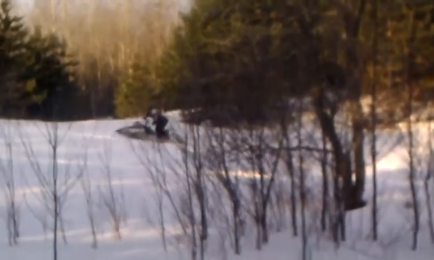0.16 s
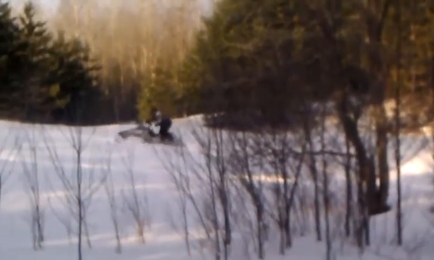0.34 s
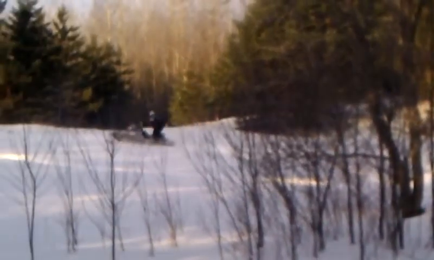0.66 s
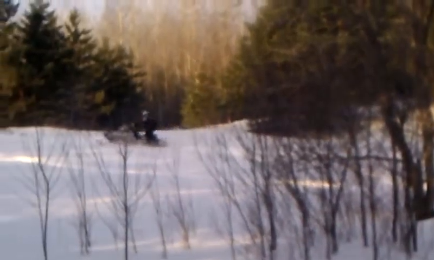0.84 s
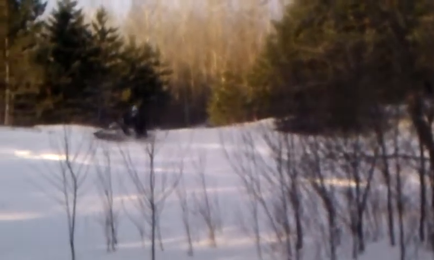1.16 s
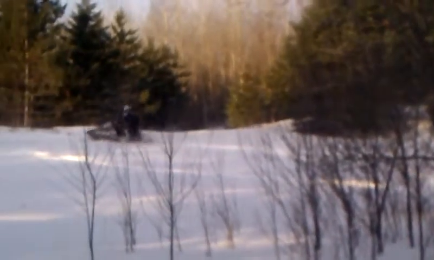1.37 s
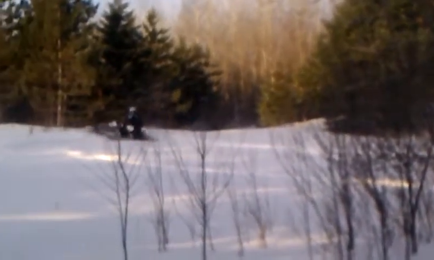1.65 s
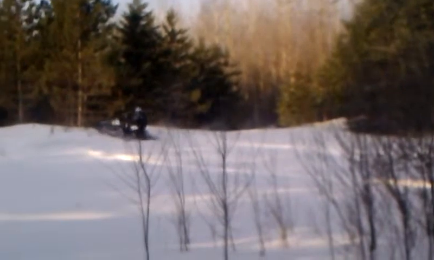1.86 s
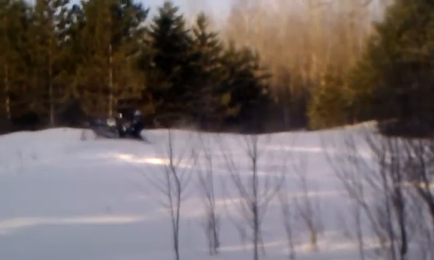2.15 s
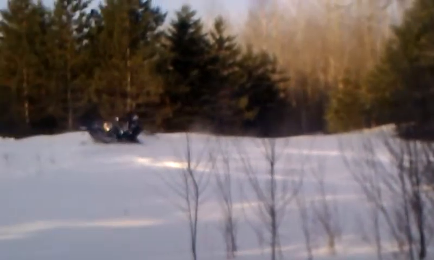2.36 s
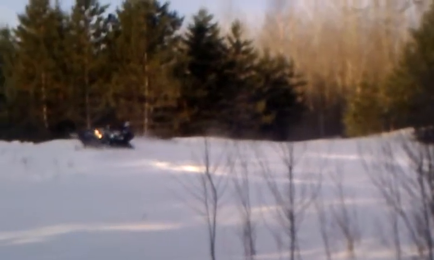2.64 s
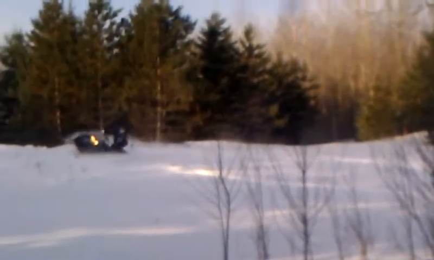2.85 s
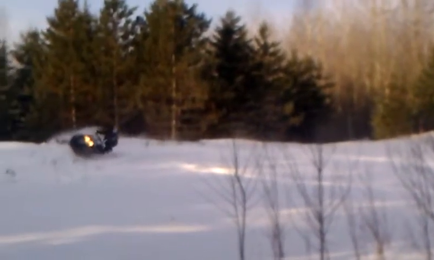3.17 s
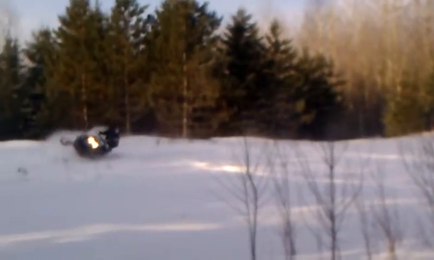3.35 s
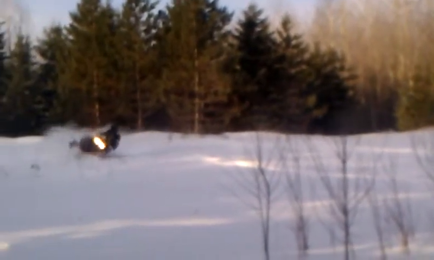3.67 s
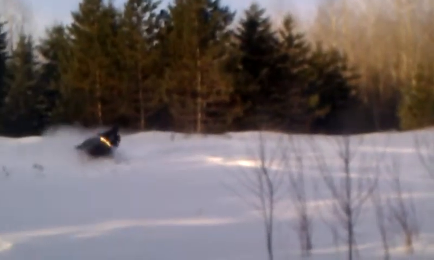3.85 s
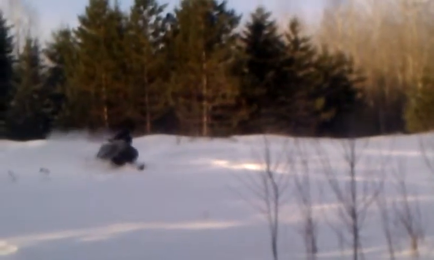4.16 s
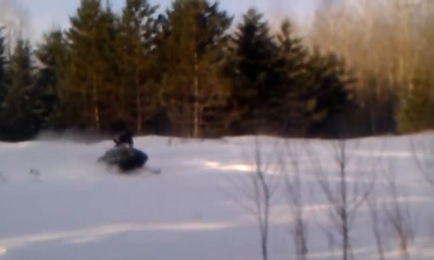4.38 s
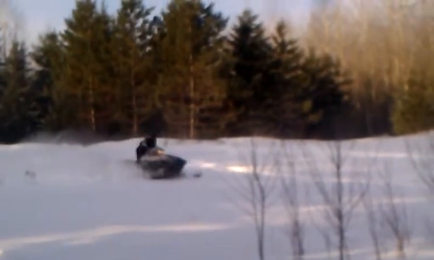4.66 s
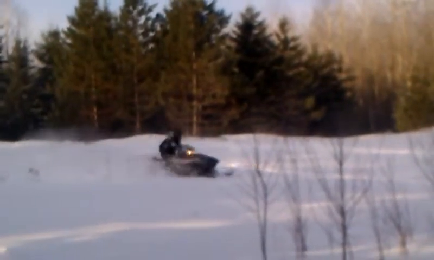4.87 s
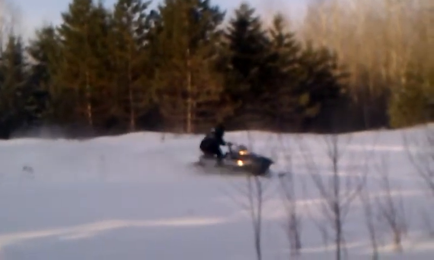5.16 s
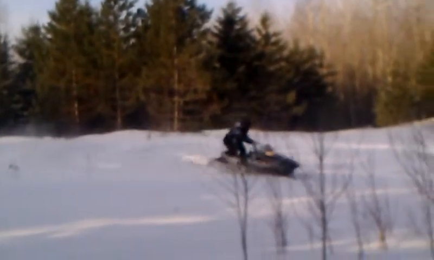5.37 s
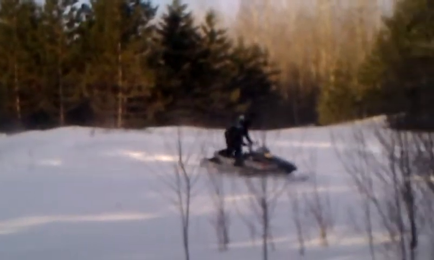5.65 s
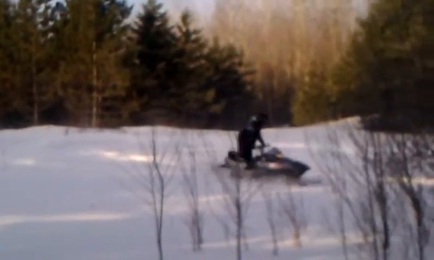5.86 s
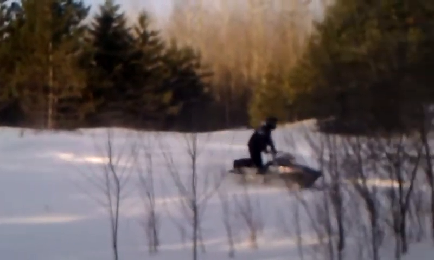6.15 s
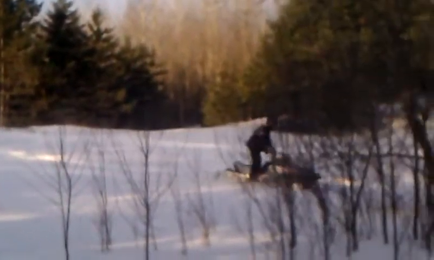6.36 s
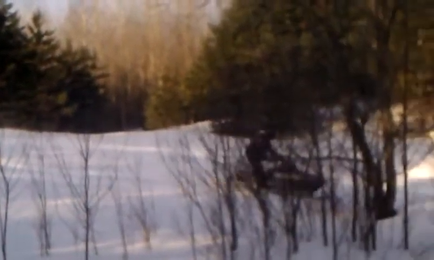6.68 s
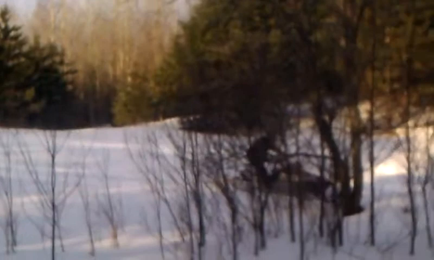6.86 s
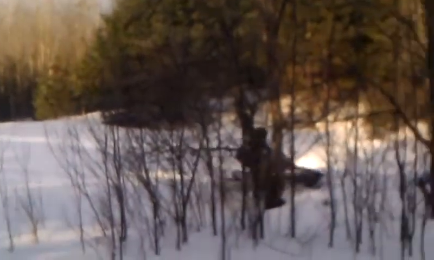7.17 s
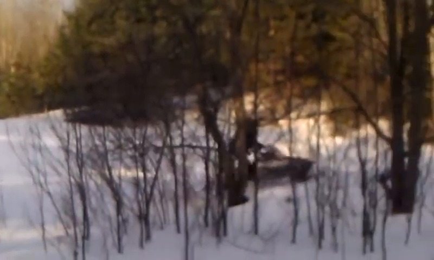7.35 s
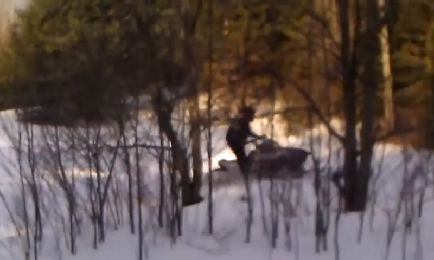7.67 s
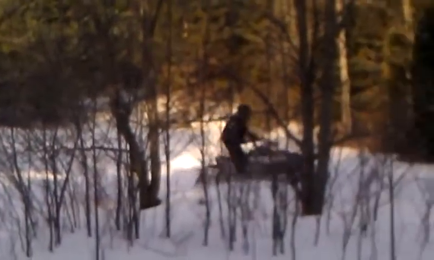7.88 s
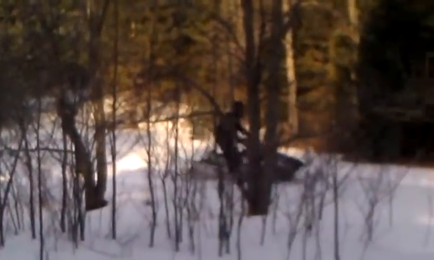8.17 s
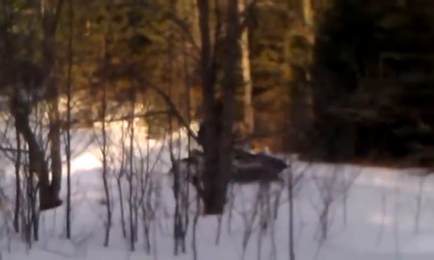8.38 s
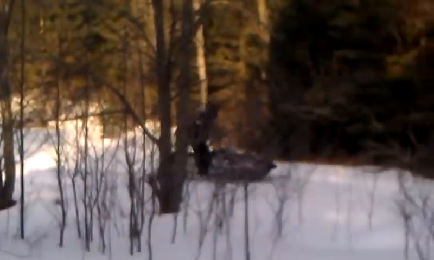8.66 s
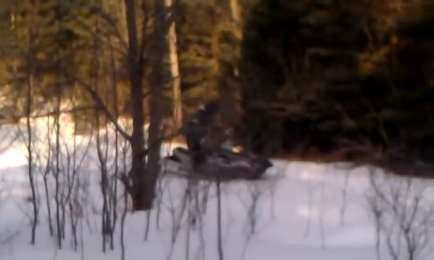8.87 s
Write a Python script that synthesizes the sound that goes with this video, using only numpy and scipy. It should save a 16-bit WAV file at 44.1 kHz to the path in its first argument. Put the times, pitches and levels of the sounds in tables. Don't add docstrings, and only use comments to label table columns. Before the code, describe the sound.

Buzzy, raspy snowmobile engine revving in bursts, holding a distorted full-throttle howl, then dropping to stuttering pops with short revs among trees.

```python
import sys
import numpy as np
from scipy import signal
from scipy.io import wavfile
from scipy.ndimage import uniform_filter1d, minimum_filter1d

SR = 44100
rng = np.random.default_rng(int(sys.argv[2]) if len(sys.argv) > 2 else 0)


def voltage_ratio(level):
    return 10 ** (np.asarray(level, float) / 20)


def bounce(signal):
    frames = np.transpose(np.atleast_2d(signal))
    limited = np.clip(frames, -1, 1)
    pcm = np.round(limited * 32767).astype(np.int16)
    wavfile.write(sys.argv[1], SR, pcm)


N = 397782
SPLIT_HZ = 1120
LOAD_LAG_S, MIDDLE_HZ = 0.042, 200

# start_s, firing_rate_hz headed for, gas_noise_share (0-1)
LEVER = [(0, 156, .8), (.16, 248, .3), (.38, 202, .35), (.49, 75, .9), (.65, 257, .33), (.83, 212, .35),
         (.88, 126, .9), (1.41, 239, .33), (1.65, 210, .3), (1.73, 286, .3), (2.03, 262.4, .22),
         (2.85, 266.4, .1), (4.84, 116, .85), (5.61, 270, .27), (5.75, 273, .27), (5.87, 112, .85),
         (6.28, 175, .6), (6.49, 228, .27), (6.67, 142, .3), (6.8, 163, .3), (7.16, 139, .5),
         (7.42, 249, .25), (7.62, 124, .75), (8.09, 135.3, .75)]
LOAD_DB = [-26, -26.5, -33, -29.5, -26.5, -33, -29.5, -25.5, -27, -29, -28, -27, -26.5, -20.5, -23, -28,
           -26.5, -20.5, -23.5, -24.5, -28.5, -18, -28, -27.5]
# start_s, peak_db, decay_t60_s
POPS = [(5.697, -6, 0.13), (5.71, -5, 0.11), (6.152, -9.5, 0.13), (6.173, -15, 0.054), (6.236, -8, 0.076),
        (6.28, -8.5, 0.058), (6.329, -14, 0.27), (6.417, -11.5, 0.47), (6.748, -5.5, 0.3),
        (6.789, -11, 0.27), (6.812, -4, 0.26), (6.85, -11.5, 0.22), (6.905, -13, 0.2), (6.946, -13, 0.15),
        (6.97, -11, 0.17), (7.035, -3.5, 0.2), (7.185, -8, 0.052), (7.212, -14, 0.095), (7.26, -11, 0.05),
        (7.279, -11.5, 0.049), (7.347, -10, 0.086), (7.378, -11.5, 0.33), (7.399, -8, 0.23),
        (7.656, -7, 0.15), (7.729, -4, 0.059), (7.748, -5.5, 0.12), (7.791, -5.5, 0.053),
        (7.809, -4.5, 0.047), (7.856, -4, 0.11), (7.874, -7.5, 0.073), (7.907, -8, 0.05),
        (7.962, -6, 0.063), (7.983, -9.5, 0.045), (8.037, -11, 0.12), (8.099, -13.5, 0.39),
        (8.177, -9.5, 0.1), (8.25, -8.5, 0.034), (8.273, -10, 0.05), (8.308, -10, 0.04), (8.346, -9, 0.11),
        (8.405, -12, 0.41), (8.42, -16, 0.1), (8.473, -15.5, 0.05), (8.481, -12, 0.068), (8.553, -24, 0.11),
        (8.612, -14, 0.11), (8.65, -14, 0.071), (8.672, -13, 0.054), (8.699, -12.5, 0.073),
        (8.732, -13, 0.06), (8.767, -8, 0.062), (8.791, -16, 0.045), (8.83, -14, 0.075),
        (8.849, -12.5, 0.093), (8.916, -13, 0.079), (8.953, -13, 0.1)]
# time_s, away_share (0-1)
TURNING = [
    (0, 0.2),
    (5.5, 0.02),
    (6.1, 0.81),
    (9.1, 0.93),
]
# time_s, first_db, fifth_db, sixth_db, half_orders_db
ARC = [(1.9, -3, 0, 5.5, 9), (2.3, 0.5, -8, -4, 9), (2.6, -2.5, 1, -7, -3), (3.0, -4.5, -0.5, -5, 4),
       (3.3, -11.5, -3.5, -0.5, -1.5), (3.6, -3, 2.5, 1.5, 0), (4.0, 1.5, -1.5, -1.5, 0.5),
       (4.3, 4, -2.5, 0, -1.5), (4.5, 8, 4.5, 2.5, -1.5), (4.8, -5.5, 2, 0, -4.5)]
# time_s, reduction_db
HELD = [(0, 0), (1.9, 0), (2.2, 1), (3.06, 1.5), (3.18, 7), (3.32, 9.5), (3.7, 11.5), (4.0, 12.5),
        (4.85, 12.5), (4.89, 3), (5.05, 0), (9.1, 0)]
# frequency_hz, level_db
ROAR = [(59, -67.5), (100, -56.5), (260, -23), (479, -22), (515, -12), (719, -19.5), (773, 0), (868, -12),
        (1030, -11.5), (1190, -14.5), (1280, -3), (1480, -2), (1650, -7.5), (2100, -2.5), (2300, -7),
        (2450, -15.5), (3200, -24), (4160, -68), (7040, -120)]


def engine():
    _, target_hz, noise_share = np.transpose(LEVER)
    hz = uniform_filter1d(lever(target_hz, 0.238, 143), size=2000)
    rough = lever(noise_share, LOAD_LAG_S, noise_share[0])
    opening_db = lever(LOAD_DB, LOAD_LAG_S, LOAD_DB[0])
    shutting_db = lever(LOAD_DB, 0.026, LOAD_DB[0])
    load_db = np.minimum(opening_db, shutting_db)
    away = np.clip(curve(TURNING)[0], 0, 1)
    db_per_hz = 0.1624 - 0.0866 * away
    exhaust_db = load_db + db_per_hz * (hz - MIDDLE_HZ)
    turns = np.cumsum(hz * (1 + 0.0014 * wander(hz=10))) / SR
    throttle = np.clip((hz - 222) / 38, 0, 1)
    puff = np.exp(-(turns % 1) / 6.1)
    return (exhaust(turns, rough, throttle, away, puff, exhaust_db)
            + purr(turns, hz, throttle, away, exhaust_db)
            + hiss(hz, throttle, away, puff)
            + pops(hz))


def exhaust(turns, rough, throttle, away, puff, exhaust_db):
    low_note_db = [2.5, -2, 2, -3.5, 0, -9.5, 1.5, -3, 5, 0.1, 4, 1, 1, 7.5, 0.5, -3, 5, -2, 3, 8, 5, -3, 5,
                   5.5]
    high_note_db = [3, 3, 3, 3, 3, 3, 3, 0.1, 0.1, 0.1, 0.1, 0.1, 3, 3, 6.7, 0.1, 0.1, 3, 0.1, 0.1, 0.1,
                    0.1, 0.1, 0.1]
    pulses = exhaust_pulses(turns, rough, throttle, away)
    gas = gas_noise(rough, throttle, away, puff)
    blend = voltage_ratio(exhaust_db) * (np.sqrt(1 - rough) * pulses + np.sqrt(rough) * gas)
    x = note(blend, [150, SPLIT_HZ], misses()) + abs(gusts()) * gas
    x = note(x, [650, 1050], lever(low_note_db, LOAD_LAG_S, low_note_db[0]))
    return note(x, [1780, 2340], lever(high_note_db, LOAD_LAG_S, high_note_db[0]))


def exhaust_pulses(turns, rough, throttle, away):
    # frequency_hz, gain_db
    facing = [(100, -7), (400, -3.5), (620, 5), (800, -18), (960, 12), (1400, -2.5), (3000, 3)]
    piped = tail_pipe(turns, rough)
    lumpy = steady((1 - away) * colour(piped, facing) + away * piped)
    return np.sqrt(throttle) * orders(turns) + np.sqrt(1 - throttle) * lumpy


def orders(turns):
    # multiple of the firing rate, level_db
    multiples = [(1, -7.5), (2, -1), (3, 10), (4, -1), (5, 6), (6, 4), (7, 2.5), (8, 3.5), (9, -3),
                 (10, -9.5), (11, -14), (12, -20), (13, -14), (14, -14.5), (15, -10), (16, -12.5),
                 (17, -13.5), (18, -13), (19, -27.5), (20, -23.5), (21, -32), (22, -24.5), (23, -29),
                 (24, -16.5)]
    # frequency_hz, level_db
    half_response = [(100, -38), (400, -39.5), (660, -21.5), (930, -12.5), (1200, -32), (1500, -20),
                     (2000, -18), (2500, -55.5), (4000, -25.5), (6000, -29), (8600, -54.5), (11000, -90)]

    def swell():
        return abs(1 + 0.45 * (wander(hz=7) + 1j * wander(hz=7)))

    def partial(k):
        return np.cos(2 * np.pi * (k * turns + rng.random()))

    first_db, fifth_db, sixth_db, half_db = curve(ARC)
    turned_db = {1: first_db, 5: fifth_db, 6: sixth_db}
    whole = np.zeros(N)
    for k, db in multiples + [(k, -26.5) for k in range(25, 33)]:
        if k != 3:
            upper_db = 4.5 * (k > 9)
            whole += voltage_ratio(db + upper_db + turned_db.get(k, 0)) * swell() * partial(k)
    f, db = np.transpose(half_response)
    half = np.zeros(N)
    for k in np.arange(12) + 0.5:
        half += voltage_ratio(np.interp(k * 265, f, db)) * partial(k)
    return evened(whole + voltage_ratio(half_db) * half * swell())


def tail_pipe(turns, rough):
    # frequency_hz, gain_db
    response = [(59, -87.5), (100, -55.5), (185, -26.5), (279, -12), (390, 3), (461, -4), (506, -9.5),
                (600, -8), (680, 8), (765, 6), (850, -3.5), (972, -5.5), (1110, -14), (1440, 6.5),
                (3390, -34), (6500, -17.5), (8600, -37.5), (11200, -62.5), (18900, -120)]
    low = butter(firings(turns, 0.65 * rough, 6), 4, SPLIT_HZ, "low")
    high = butter(firings(turns, rough, 14), 4, SPLIT_HZ, "high")
    return colour(low + smeared(high), response)


def firings(turns, rough, scatter):
    at = np.flatnonzero(np.diff(np.floor(turns)) > 0)
    late = (turns[at + 1] % 1) / (turns[at + 1] - turns[at])
    chance = rng.standard_normal((4000, 2))[:len(at)]
    size = voltage_ratio(6.2 * (np.arange(len(at)) % 2) + 8.0 * rough[at] * chance[:, 0])
    place = at + 1 - late + scatter * rough[at] * chance[:, 1]
    whole = np.clip(place.astype(int), 0, N - 2)
    train = np.zeros(N)
    np.add.at(train, whole, size * (1 - place % 1))
    np.add.at(train, whole + 1, size * (place % 1))
    return train


def smeared(x):
    t = np.arange(2000) / SR
    taps = rng.choice([-1., 1.], len(t)) * (rng.random(len(t)) < 1200 / SR) * np.exp(-t / 0.0056)
    taps = voltage_ratio(5) * taps / np.linalg.norm(taps) + (t == 0)
    return signal.oaconvolve(x, taps / np.linalg.norm(taps))[:N]


def gas_noise(rough, throttle, away, puff):
    # frequency_hz, level_db
    roar_away = [(59, -73.5), (100, -42.5), (176, -13.5), (358, -11.5), (402, -7.5), (578, -7.5),
                 (678, -10), (947, -6.5), (1130, -12.5), (1440, 0), (1720, -8), (2330, -9), (3200, -45),
                 (4160, -63), (7040, -120)]
    jet = (0.5 + puff) * rng.standard_normal(N)
    gas = (1 - away) * evened(colour(jet, ROAR)) + away * evened(colour(jet, roar_away))
    clear_db = -4 * np.clip(2 - 3 * rough, 0, 1) * (1 - throttle)
    return note(gas, [150, SPLIT_HZ], clear_db)


def misses():
    miss_s = 0.016
    train = np.zeros(N)
    train[((np.transpose(POPS)[0] - miss_s) * SR).astype(int)] = 1
    hole = np.hanning(int(miss_s * SR)) ** 0.5
    return -7 * np.minimum(signal.oaconvolve(train, hole)[:N], 1)


def gusts():
    s, db, _ = np.transpose(POPS)
    gust_s = 0.023
    train, t = np.zeros(N), np.arange(SR // 5) / SR
    train[(s * SR).astype(int)] = voltage_ratio(db - 31.5)
    return signal.oaconvolve(train, np.sqrt(t / gust_s) * np.exp(1 - 2 * t / gust_s))[:N]


def purr(turns, hz, throttle, away, exhaust_db):
    # pitch_hz, level_db
    pipe_mode = [(360, 7), (405, -1), (450, -6), (520, -13), (620, -25), (720, -10), (800, -9.5)]
    # time_s, gain_db
    swing = [(1.9, 3), (2.4, -3.5), (2.65, 4), (3.1, -4), (3.45, 3.5), (3.85, -5), (4.25, 1), (4.5, -1.5),
             (4.7, 0.5), (4.9, -2.5)]

    def tone(k):
        return np.sin(2 * np.pi * k * turns)

    purr_db = exhaust_db + np.interp(3 * hz, *np.transpose(pipe_mode))
    purr_db += -15 * (1 - np.maximum(away, throttle))
    purr_db += 0.58 * curve(HELD)[0]
    purr_db += throttle * curve(swing)[0]
    third = voltage_ratio(purr_db + (1 + 1.8 * throttle) * wander(hz=9)) * np.sqrt(2) * tone(3)
    nearing_db = 1.5 * np.arange(N) / SR
    beat_db = exhaust_db - 33.5 + throttle * curve(ARC)[0] + nearing_db + 2.0 * wander(hz=1.4)
    beat = voltage_ratio(beat_db) * (tone(1) + voltage_ratio(0.5) * tone(2))
    coasting = away * np.clip((150 - hz) / 15, 0, 1)
    neighbours = voltage_ratio(-12) * tone(2) + voltage_ratio(-11) * tone(4)
    return third + beat + coasting * voltage_ratio(purr_db + 2.0 * wander(hz=4.9)) * neighbours


def hiss(hz, throttle, away, puff):
    # frequency_hz, level_db
    spectrum = [(1470, -25), (2500, -1), (2660, 5), (2760, -2.5), (3390, -3.5), (4100, 3), (4910, 2),
                (5250, -4), (6520, -2.5), (8300, -9.5), (8800, -31), (11400, -80), (19400, -120)]
    lagged_db = lever(LOAD_DB, 0.035, LOAD_DB[0])
    level_db = -32.5 + 0.09 * (lagged_db - np.mean(LOAD_DB))
    level_db += -5.5 * away - 6.5 * throttle
    level_db += (0.2126 - 0.078 * away) * (hz - MIDDLE_HZ)
    level_db += 1.01 * (np.arange(N) - N / 2) / SR
    noise = evened(colour((2.0 + puff) * rng.standard_normal(N), spectrum))
    return voltage_ratio(level_db + 1.0 * wander(hz=25.0)) * noise


def pops(hz):
    # frequency_hz, gain_db
    ringing = [(60, -83), (200, -6), (420, 3.5), (750, 7), (950, 6), (1150, -9.5), (1450, 6.5), (2000, -31),
               (3000, -47), (8000, -40)]
    train, k = np.zeros(N + SR), np.arange(8)
    chance = rng.standard_normal((len(POPS), 8))
    for (s, db, t60), luck in zip(POPS, chance):
        lag = k / hz[int(s * SR)]
        level_db = db - 60 * lag / max(t60, 0.02) - 3.5 * abs(luck) * (k > 0)
        level_db += -5 * (k == 0) * (t60 > 0.13)
        train[((s + 0.0005 + lag) * SR).astype(int)] += voltage_ratio(level_db)
    unit = np.abs(colour(np.eye(1, 2048)[0], ringing)).max()
    s, db, _ = np.transpose(POPS)
    ring_db = 1.42 * (np.interp(np.arange(N) / SR, s, db) + 9)
    return note(colour(train[:N], ringing), [1200, 1750], ring_db) / unit * voltage_ratio(-6.5)


def track_thud():
    # time_s, level_db
    thud = [(0, -69), (1.2, -66), (4.8, -63), (5.4, -61.5), (6.0, -58), (6.7, -59), (7.3, -56), (7.8, -54),
            (8.3, -49), (9.1, -61)]
    low = butter(rng.standard_normal(N), 2, [85, 200], "band")
    return voltage_ratio(curve(thud)[0] - 1.0) * evened(low)


def trees(x):
    # delay_s, level_db
    echo = [(.06, -1.5), (0.198, -5), (.28, -11), (.4, -19.5), (.55, -17.5), (0.731, -11.5), (0.79, -31),
            (1.201, -68.5)]
    # frequency_hz, gain_db
    echo_colour = [(100, -13), (300, -7), (530, 4), (800, -3), (1050, 2), (1300, -3.5), (1600, -4.5),
                   (2100, -14), (3000, -11.5), (8000, -10.5)]
    t = np.arange(N) / SR
    receding = np.interp(t - 0.016 * (t - 3.5) + 0.0002 * wander(hz=4), t, x)
    delay, db = np.transpose(echo)
    lag = np.arange(int(1.2 * SR)) / SR
    taps = rng.choice([-1., 1.], len(lag)) * (rng.random(len(lag)) < 1500 / SR)
    taps = taps / np.linalg.norm(taps) * voltage_ratio(np.interp(lag, delay, db, left=-90))
    scattered = colour(signal.fftconvolve(receding, taps)[:N], echo_colour)
    return voltage_ratio(-4.5 - 3.5 * curve(TURNING)[0] + wander(hz=5.6)) * scattered


def air_noise():
    return voltage_ratio(-72.5) * evened(colour(rng.standard_normal(N), ROAR))


def lever(values, lag_s, start):
    moves_s = [row[0] for row in LEVER]
    step = np.asarray(values, float)[np.searchsorted(moves_s, np.arange(N) / SR, "right") - 1]
    keep = np.exp(-1 / (lag_s * SR))
    return start + signal.lfilter([1 - keep], [1, -keep], step - start)


def curve(points):
    s, *columns = np.transpose(points)
    return [np.interp(np.arange(N) / SR, s, c) for c in columns]


def wander(hz):
    sos = signal.butter(2, hz, fs=SR / 100, output="sos")
    slow = signal.sosfilt(sos, rng.standard_normal(N // 100 + 400))[399:]
    return np.interp(np.arange(N) / 100, np.arange(len(slow)), evened(slow))


def evened(x):
    return x / np.sqrt(np.mean(x ** 2) + 1e-20)


def steady(x):
    return x / np.sqrt(abs(uniform_filter1d(x ** 2, size=6000)) + 1e-12)


def butter(x, order, hz, kind):
    return signal.sosfilt(signal.butter(order, hz, kind, fs=SR, output="sos"), x)


def note(x, band_hz, db):
    sos = signal.butter(2, band_hz, "band", fs=SR, output="sos")
    return x + (voltage_ratio(db) - 1) * signal.sosfiltfilt(sos, x)


def colour(x, points):
    f, db = np.transpose(points)
    hz = abs(np.fft.fftfreq(8192, 1 / SR))
    gain_db = np.interp(np.log(hz + 1), np.log(f + 1), db)
    log_gain = np.log(voltage_ratio(np.maximum(gain_db, -100)))
    taps = np.fft.ifft(np.exp(log_gain - 1j * signal.hilbert(log_gain).imag)).real[:4096]
    return signal.oaconvolve(x, taps)[:len(x)]


def masked(x):
    # frequency_hz, level_db
    threshold = [(20, -50), (130, -48), (250, -70), (3000, -60), (5500, -38.5), (8200, -42), (8900, -39),
                 (9500, -50.5), (12000, -53.5), (16000, -55.5)]
    hz, _, z = signal.stft(x, SR, nperseg=1024)
    power = abs(z) ** 2
    f, db = np.transpose(threshold)
    threshold_db = np.interp(np.log(hz + 1), np.log(f + 1), db)
    floor = minimum_filter1d(power.sum(0), size=5) * voltage_ratio(2 * threshold_db)[:, None]
    local = uniform_filter1d(uniform_filter1d(power, size=3, axis=0), size=2, axis=1)
    return signal.istft(z * (local > floor), SR, nperseg=1024)[1][:N]


def scene():
    sled = engine() * voltage_ratio(curve(HELD)[0])
    return (sled + track_thud() + trees(sled) + air_noise())[None]


def band_limit(x):
    return signal.sosfilt(signal.butter(12, 15700, fs=SR, output="sos"), x)


def record(dry):
    edge = signal.firwin(401, 8650, window=("kaiser", 9), fs=SR)
    x = signal.oaconvolve(dry, edge[None], "same")
    x = butter(x, 3, 150, "high")
    peaks = np.clip(x - 0.17, 0, 0.15)
    bent = butter(peaks, 2, [12, 200], "band")
    held = curve(HELD)[0]
    full = np.clip((held - 4) / 6, 0, 1)
    x = (1 - full) * x + full * voltage_ratio(held - 15.5) * steady(x)
    x = np.clip(x, -voltage_ratio(-4.2), voltage_ratio(-2.5))
    x = (x + voltage_ratio(-13.0) * np.clip(held, 0.4, 1) * bent) / voltage_ratio(held)
    return band_limit(masked(x[0])[None])


dry = scene()
out = record(dry)
bounce(out)
```